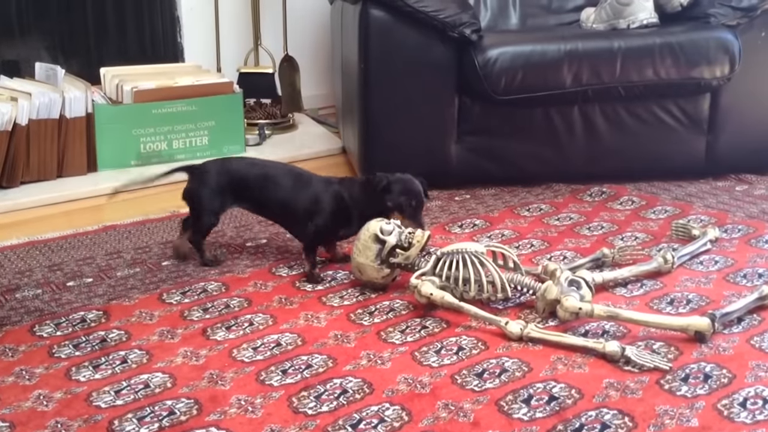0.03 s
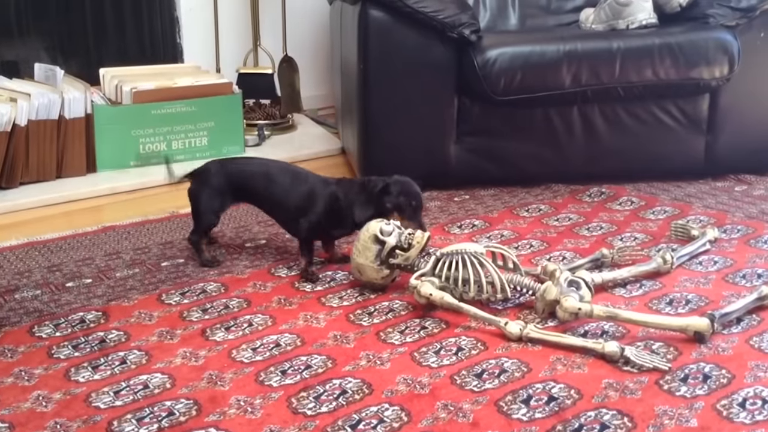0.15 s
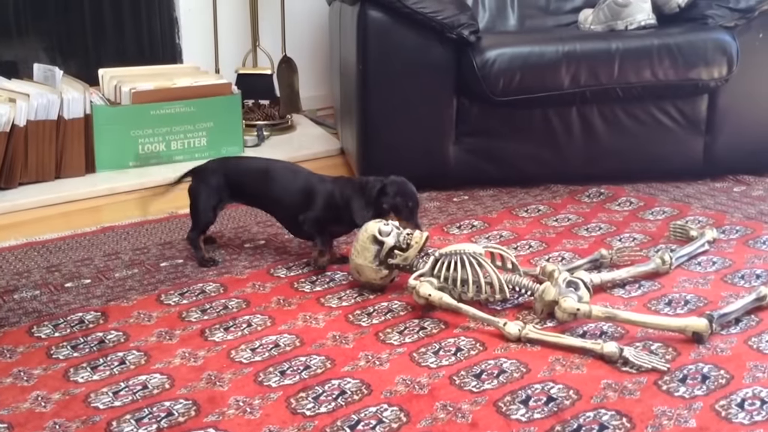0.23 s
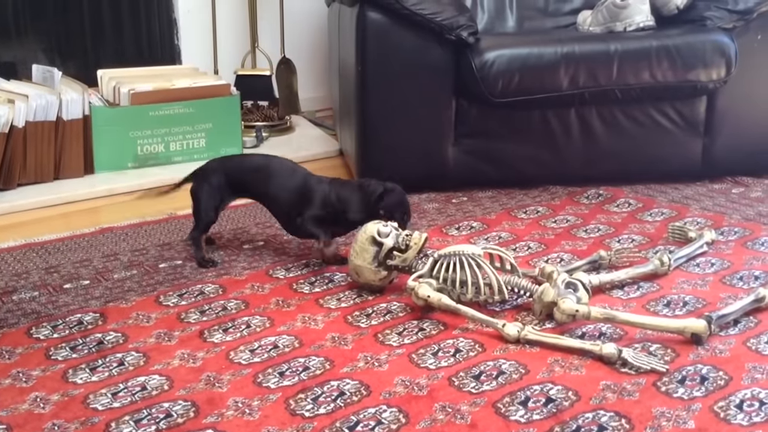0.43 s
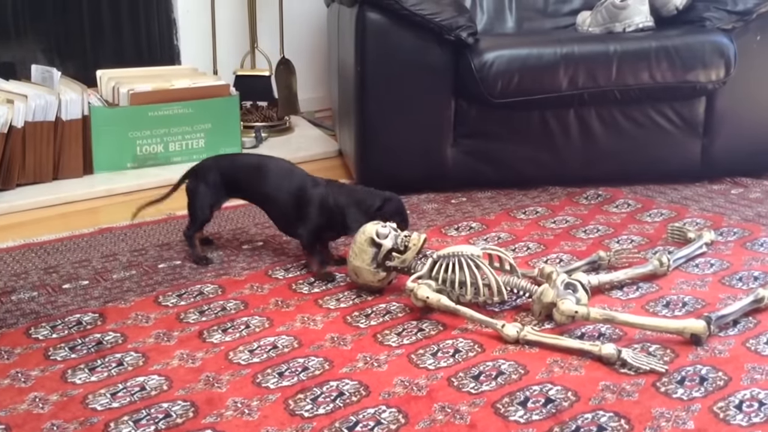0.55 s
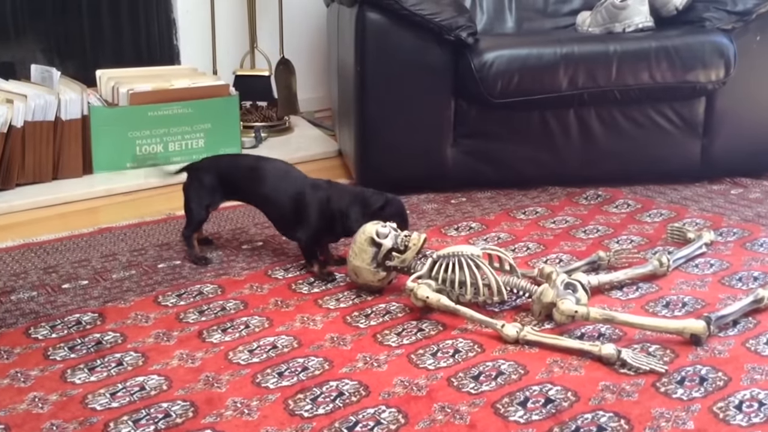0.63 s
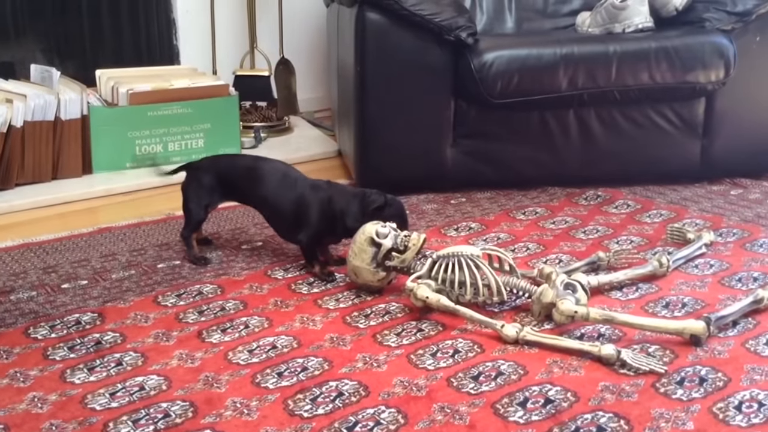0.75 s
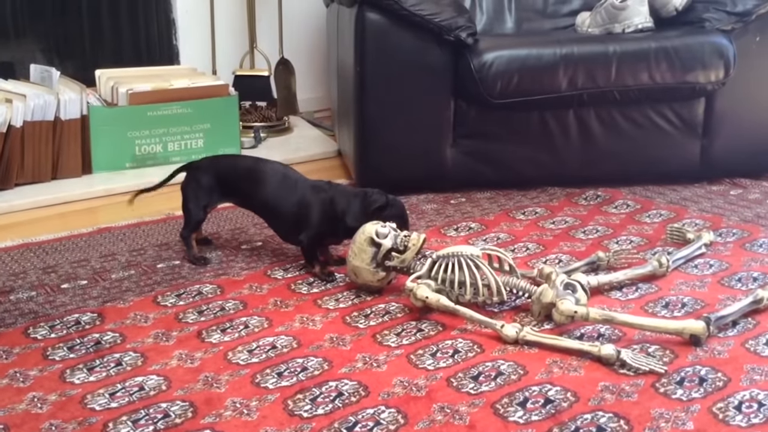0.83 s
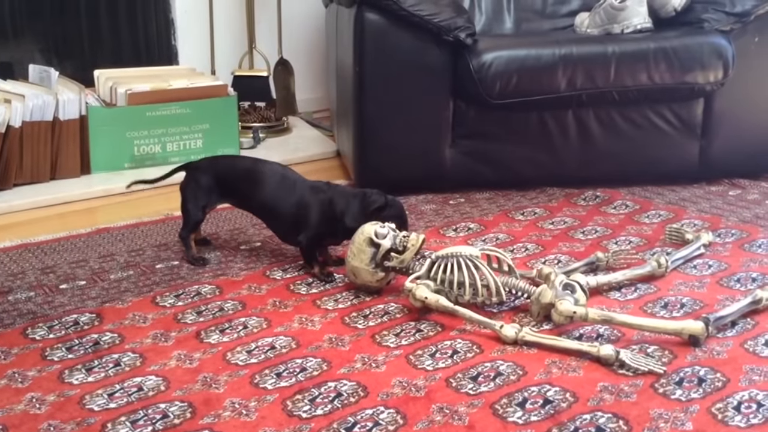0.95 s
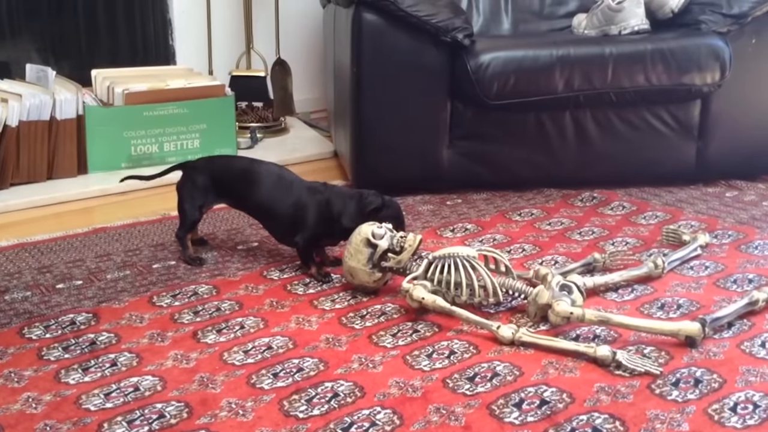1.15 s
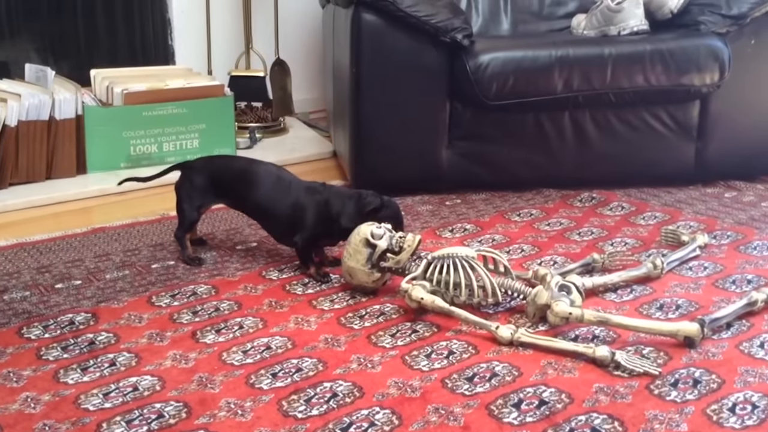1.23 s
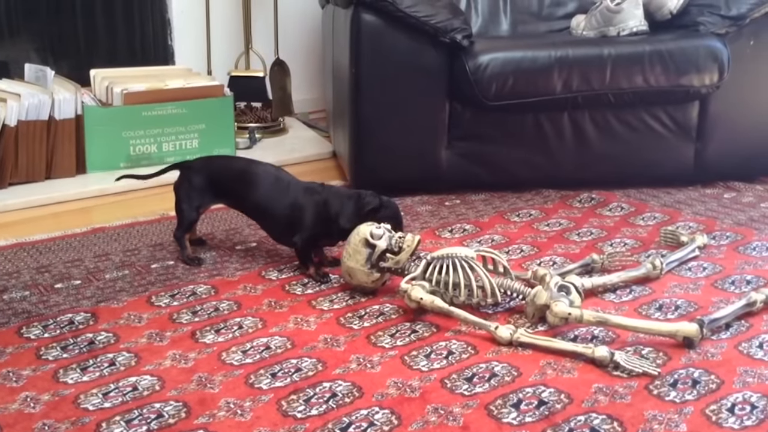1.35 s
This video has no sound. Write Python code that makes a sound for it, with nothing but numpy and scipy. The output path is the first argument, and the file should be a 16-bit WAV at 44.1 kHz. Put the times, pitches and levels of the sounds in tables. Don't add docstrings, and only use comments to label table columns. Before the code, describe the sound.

A small dog barks twice, sharp and high, a few metres from a phone microphone in an echoing living room; faint low moans follow each bark, and a quiet snort ends it.

```python
import sys
import numpy as np
from scipy import signal
from scipy.fft import rfft, irfft, next_fast_len
from scipy.io import wavfile
from scipy.ndimage import uniform_filter1d, minimum_filter1d

SR = 44100
rng = np.random.default_rng(int(sys.argv[2]) if len(sys.argv) > 2 else 0)


def gain_from_decibels(decibels):
    exponent = np.asarray(decibels, float) / 20
    return 10 ** exponent


def wrap_up_sound(samples):
    columns = np.atleast_2d(samples).T
    tamed = np.clip(columns, -1, 1)
    steps = np.round(tamed * 32767).astype(np.int16)
    wavfile.write(sys.argv[1], SR, steps)


N = 61739
LEAD = SR // 4

# (time [s], pitch [Hz], level [dB], roughness [0-1], brightness [dB])
BARKS = [
    [(-.2, 480, -25, .1, 14), (-.16, 830, -23, 0.17, -6.), (-.06, 846, -17, 0.24, -8.5),
     (-.04, 600, -31, 0.42, 0.5), (-.005, 350, -42, 0, -9)],
    [(.181, 450, -74.5, 0, -48.5), (.19, 519.9, -26.5, 0, -12.5), (.21, 718.5, -12, 0.13, -2.5),
     (.224, 860, -5.5, 0.22, -6), (.24, 885.5, -18, 0.62, 1.5), (.255, 898.5, -0.5, 0.2, -8.5),
     (.295, 884.5, -11, 0, -15.5), (.335, 564.3, -26, 0.32, 1), (.37, 350, -37, 0, -8.5)],
    [(.518, 570, -24.5, 0.13, -28), (.536, 615.2, -19.5, 0.23, -8), (.541, 966, -6, 0, -15.5),
     (.567, 1525, -14, 0.17, -9.5), (.577, 888.5, -5.5, 0.2, -13.5), (.61, 858.2, -11, 0.03, -5),
     (.645, 728.3, -14, 0.27, -31.5), (.69, 440, -32, 0.42, 3.), (.755, 334.7, -40, 0.27, -6)],
]
MOUTH_SCALES = [.93, 1.0, 0.933]
# (centre [Hz], width [Hz], level [dB])
THROAT = [(870, 364, 3.5), (1150, 730, -7), (1663, 370, -5.5), (1960, 770, -9.5), (2650, 83, -11),
          (3017, 220, -14), (3660, 1100, -25), (4466, 450, -19.5), (6300, 310, -30), (8130, 770, -19),
          (10600, 4700, -25), (13500, 2500, -34)]
# (time [s], pitch [Hz], level [dB])
MOANS = [
    [(.365, 200, -95), (.385, 176.7, -35.5), (.42, 152.8, -44), (.45, 170, -50), (.475, 166.8, -46.5),
     (.495, 178.8, -43.5), (.518, 210, -33.5), (.53, 206, -71)],
    [(.735, 180, -92.5), (.758, 184, -47), (.785, 170.2, -88), (.815, 176.8, -50), (.835, 178, -86),
     (.86, 173.7, -74.5), (.91, 176.3, -64)],
]
MOAN_HARMONICS_DB = [0., -7., -18.]
# (time [s], chest level [dB], nose level [dB])
SNORT_FLAPS = [(1.243, -51., -45.), (1.255, -41., -48.), (1.270, -41., -41.), (1.282, -39., -52.),
               (1.292, -50., -50.)]
# (resonance [Hz], swell time [s])
SNORT_CAVITIES = [
    (320, .0023),
    (1030, .0009),
]
# (band centre [Hz], t60 [s], level [dB])
ROOM_BANDS = [(150, 0.89, -15), (350, .42, 6.5), (600, 0.5, -8), (830, 0.52, 6), (1067.8, 0.55, 2.5),
              (2315, 0.61, 5), (4800, 0.6, -0.5), (12000, 0.42, 1)]
# (frequency [Hz], level [dB], t60 [s])
ROOM_MODES = [(715, -31., .6), (770, -29., .66), (815, -31., .66), (850, -34., .62), (878, -33., .64)]
# (frequency [Hz], level [dB])
HUSH_COLOUR = [(24, -85), (40, -12.5), (284, -3), (627, -6.5), (728, -12), (1780, -20.5), (2110, -25),
               (15000, -20.5)]

THROAT_FLOOR_DB = -50
NOTCH_HZ, NOTCH_WIDTH_HZ, NOTCH_DEPTH = 1780, 170, .75
HALF_SHARE = .96
TONE_FADE_HZ = 4470
BRIGHT_ABOVE_HZ = 3800
LOW_BRIGHT = .15
BREATH_DB, JITTER, SHIMMER_DB, WOBBLE_HZ = -8, .06, 11, 300

SNORT_WET_DB, SNORT_TICK_DB = -12, -10
SNIFF_S, SNIFF_ATTACK_S, SNIFF_DB = 1.285, .02, -62
SNIFF_LOW_HZ, SNIFF_HIGH_HZ = 251, 5840

ROOM_DB, ROOM_GAP_S, ROOM_BUILD_S = -1.5, .0011, .002
HUSH_DB = -64.5
MIC_LOW_HZ, MIC_TOP_HZ = 90, 15350
LIMIT, LIMIT_S = .72, .0009


def times():
    return (np.arange(N + LEAD) - LEAD) / SR


def unit(x):
    return x / np.sqrt(np.mean(x ** 2))


def walk(rate_hz):
    k = int(SR / rate_hz)
    noise = rng.standard_normal(N + LEAD)
    return unit(uniform_filter1d(uniform_filter1d(noise, k), k))


def shaped(x, gain_of_hz):
    n = next_fast_len(len(x))
    hz = np.maximum(np.arange(n // 2 + 1) * SR / n, 1.)
    return irfft(rfft(x, n) * gain_of_hz(hz), n)[:len(x)]


def controls(rows):
    t, r = times(), np.array(rows)
    cols = [np.interp(t, r[:, 0], c) for c in r.T[1:]]
    sounding = 1. * ((t > r[0, 0]) & (t < r[-1, 0]))
    cols[1] = gain_from_decibels(cols[1]) * uniform_filter1d(sounding, size=128)
    return cols


def throat(hz):
    dip = 1 - NOTCH_DEPTH / (1 + ((hz - NOTCH_HZ) / NOTCH_WIDTH_HZ) ** 2)
    peaks = sum(gain_from_decibels(db) / (1 + (2 * (hz - f) / width) ** 2) for f, width, db in THROAT)
    return dip * (gain_from_decibels(THROAT_FLOOR_DB) + peaks)


def treble_share(hz):
    return 1 / (1 + (BRIGHT_ABOVE_HZ / hz) ** 4)


def folds(hz, rough, bright_db, gain, mouth):
    hz = hz * (1 + JITTER * rough * walk(WOBBLE_HZ))
    phase = 2 * np.pi * np.cumsum(hz) / SR
    tone, on = np.sin(phase), gain > 0
    for k in np.arange(3, 31) / 2:
        f = k * hz[on]
        share = HALF_SHARE * rough[on] if k % 1 else 1
        reach = LOW_BRIGHT + (2 - LOW_BRIGHT) * treble_share(f)
        level = share * throat(f / mouth) * gain_from_decibels(bright_db[on] * reach)
        level = level / (1 + (f / TONE_FADE_HZ) ** 4)
        tone[on] += level * np.sin(k * phase[on] + k * k)
    return tone * gain * gain_from_decibels(SHIMMER_DB * rough * walk(WOBBLE_HZ / 2)), phase


def breath(phase, rough, bright_db, gain, mouth):
    noise = rng.standard_normal(len(phase))
    puffs = noise * (1 + np.cos(phase)) * gain * gain_from_decibels(BREATH_DB) * 10

    def low_gain(f):
        return throat(f / mouth) * (1 - treble_share(f)) / (1 + (450 / f) ** 4)

    def top_gain(f):
        return throat(f / mouth) * treble_share(f)

    low = shaped(puffs * rough * gain_from_decibels(LOW_BRIGHT * bright_db), low_gain)
    top = shaped(puffs * .54 * gain_from_decibels(bright_db + .5 * walk(99)), top_gain)
    return low + top


def bark(rows, mouth):
    hz, gain, rough, bright_db = controls(rows)
    tone, phase = folds(hz, rough, bright_db, gain, mouth)
    return tone + breath(phase, rough, bright_db, gain, mouth)


def moan(rows):
    hz, gain = controls(rows)
    phase = 2 * np.pi * np.cumsum(hz * (1 + .08 * walk(70))) / SR
    tone = 0
    for order, db in enumerate(MOAN_HARMONICS_DB, 1):
        tone = tone + gain_from_decibels(db + 5 * walk(69)) * np.sin(order * phase)
    return gain * tone


def snort():
    t, out = times(), 0
    tick = shaped(rng.standard_normal(len(t)), lambda f: 1 / (1 + (f / 9100) ** 4))
    for start, *levels_db in SNORT_FLAPS:
        age = np.maximum(t - start, 0)
        for level_db, (hz, swell) in zip(levels_db, SNORT_CAVITIES):
            envelope = age / swell * np.exp(1 - age / swell)
            out = out - gain_from_decibels(level_db) * np.cos(2 * np.pi * hz * age) * envelope
        nose_db = levels_db[1]
        out = out + gain_from_decibels(nose_db + SNORT_TICK_DB) * tick * (t > start) * np.exp(-age / .00061)
    return out + sniff(t)


def sniff(t):
    def nostrils(f):
        slope = f / (f + SNIFF_LOW_HZ) / (1 + f / SNIFF_HIGH_HZ) / np.sqrt(1 + f / 440)
        return slope + .063 / (1 + ((f - 5200) / 390) ** 2)

    air = unit(shaped(rng.standard_normal(len(t)), nostrils))
    onset = np.clip((t - SNIFF_S) / SNIFF_ATTACK_S, 0, 1)
    return air * gain_from_decibels(SNIFF_DB + 3 * walk(40.4)) * onset


def room(x):
    age = np.arange(SR) / SR
    noise, tail = rng.standard_normal(SR), 0
    centres = np.log([row[0] for row in ROOM_BANDS])
    for k, (_, t60, db) in enumerate(ROOM_BANDS):
        only_k = np.arange(len(ROOM_BANDS)) == k
        band = shaped(noise, lambda f: np.interp(np.log(f), centres, only_k))
        tail = tail + band * gain_from_decibels(db - 60 * age / t60)
    for hz, db, t60 in ROOM_MODES:
        tail = tail + 2 * gain_from_decibels(db - 60 * age / t60) * np.sin(2 * np.pi * hz * age)
    tail = tail * np.clip((age - ROOM_GAP_S) / ROOM_BUILD_S, 0, 1)
    return signal.fftconvolve(x, tail / np.sqrt(np.sum(tail ** 2)))[:len(x)]


def hush():
    hz, db = np.transpose(HUSH_COLOUR)
    noise = shaped(rng.standard_normal(N), lambda f: gain_from_decibels(np.interp(np.log(f), np.log(hz), db)))
    return gain_from_decibels(HUSH_DB) * unit(noise)


def scene():
    barks = sum(bark(rows, mouth) for rows, mouth in zip(BARKS, MOUTH_SCALES))
    voice = barks + sum(moan(rows) for rows in MOANS)
    nose = snort()
    wet = gain_from_decibels(ROOM_DB) * room(voice + gain_from_decibels(SNORT_WET_DB) * nose)
    return ((voice + nose + wet)[LEAD:] + hush())[None]


def roll_off(x):
    return signal.sosfilt(signal.butter(12, 15390, fs=SR, output="sos"), x)


def record(dry):
    x = signal.sosfilt(signal.butter(2, MIC_LOW_HZ, "high", fs=SR, output="sos"), dry)
    k = int(LIMIT_S * SR)
    needed = LIMIT / np.maximum(np.abs(x), LIMIT)
    gain = uniform_filter1d(minimum_filter1d(needed, 2 * k + 1), k)
    top_cut = signal.ellip(8, .2, 70, MIC_TOP_HZ, fs=SR, output="sos")
    mix = signal.sosfilt(top_cut, x * gain)
    return roll_off(mix)


dry = scene()
out = record(dry)
wrap_up_sound(out)
```